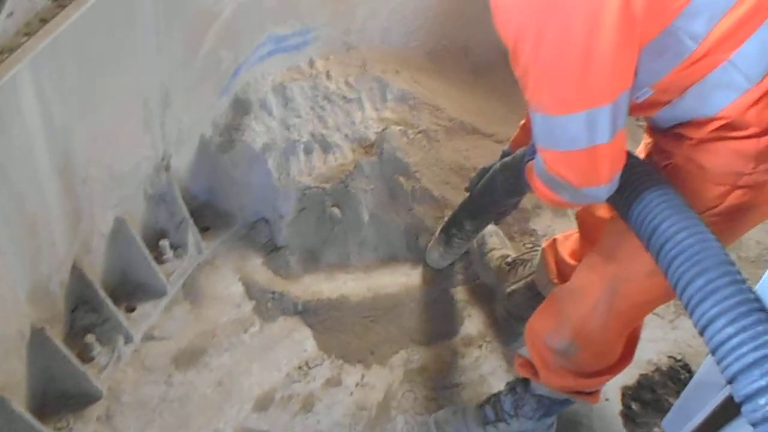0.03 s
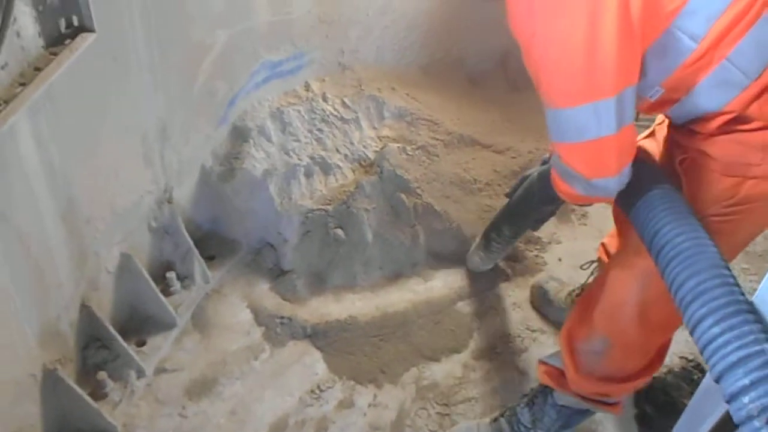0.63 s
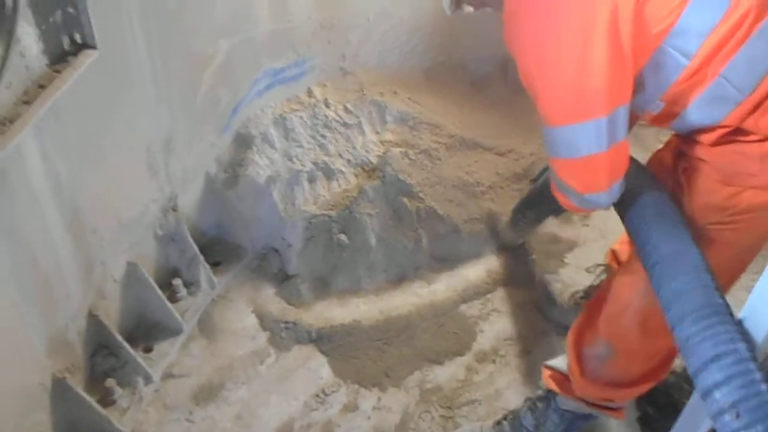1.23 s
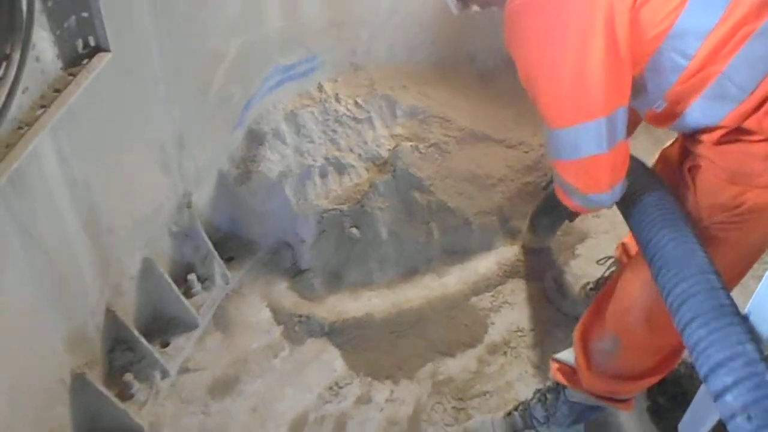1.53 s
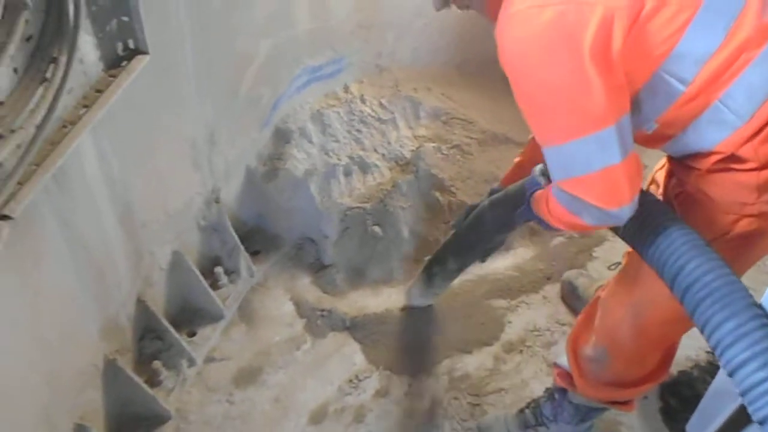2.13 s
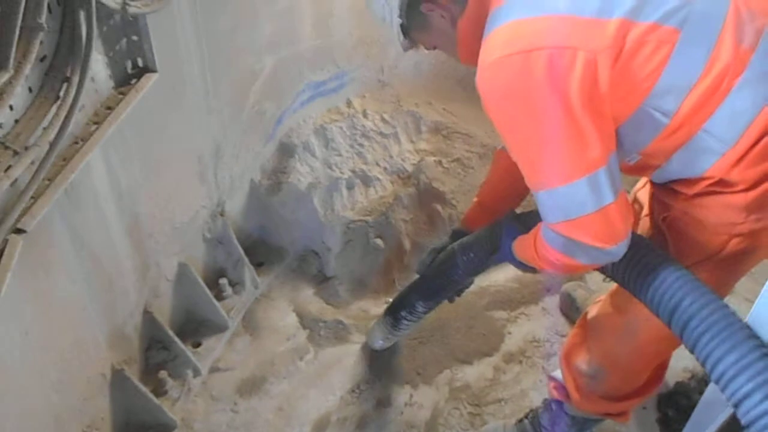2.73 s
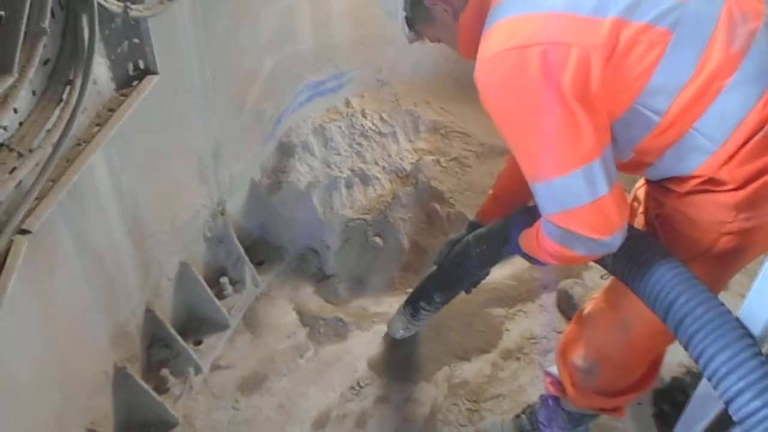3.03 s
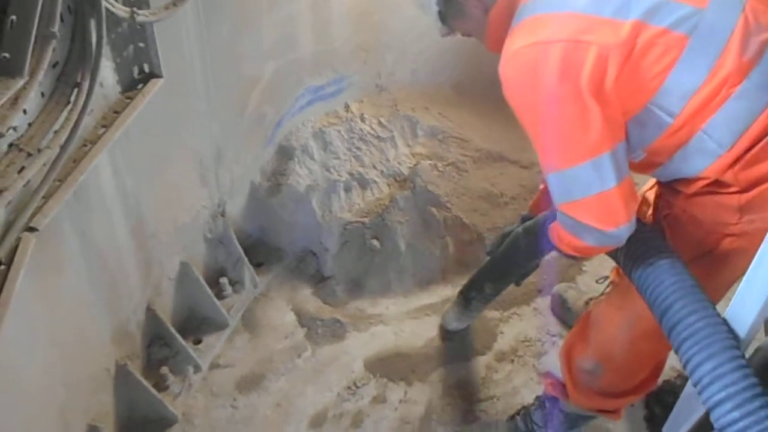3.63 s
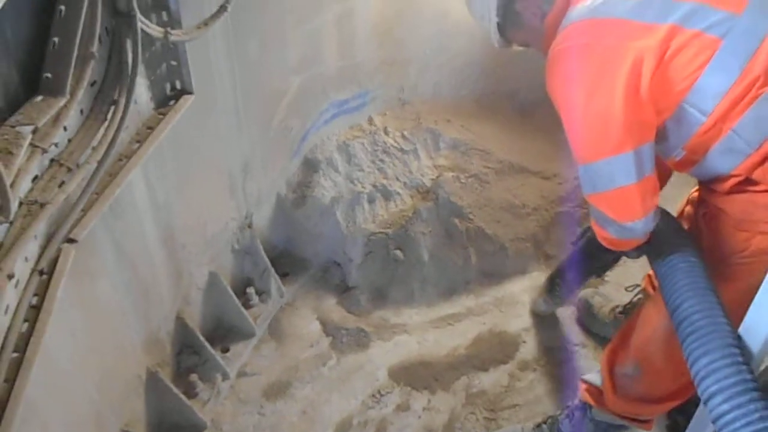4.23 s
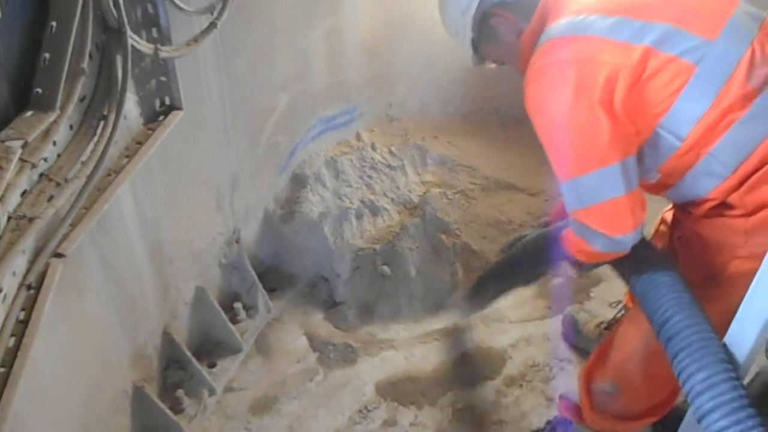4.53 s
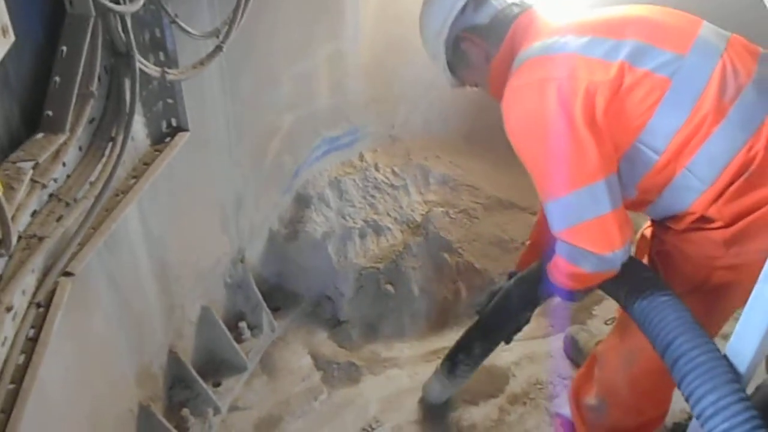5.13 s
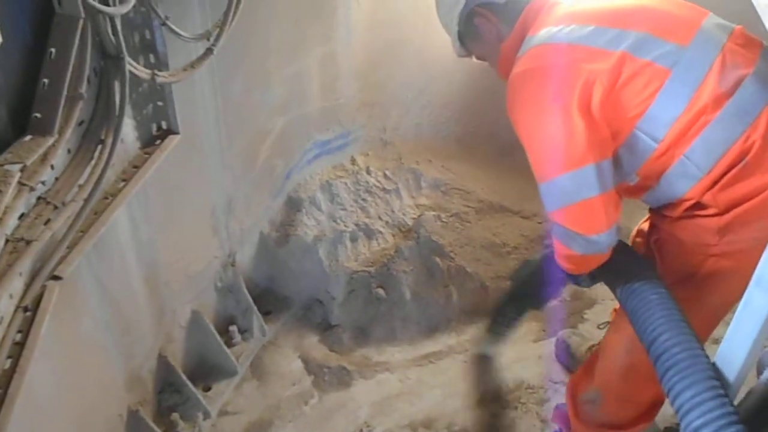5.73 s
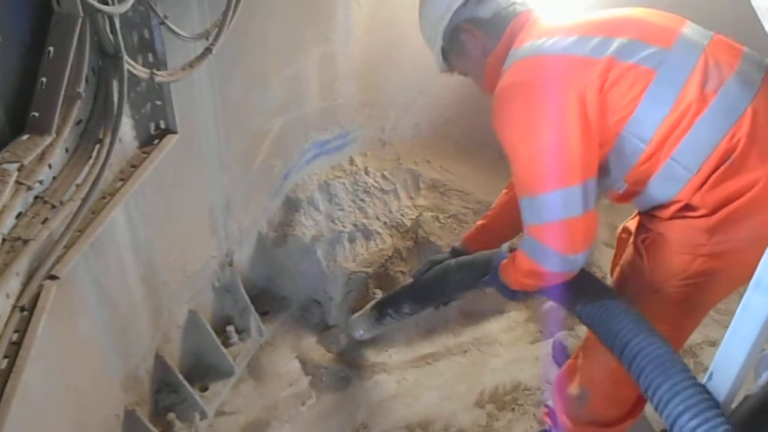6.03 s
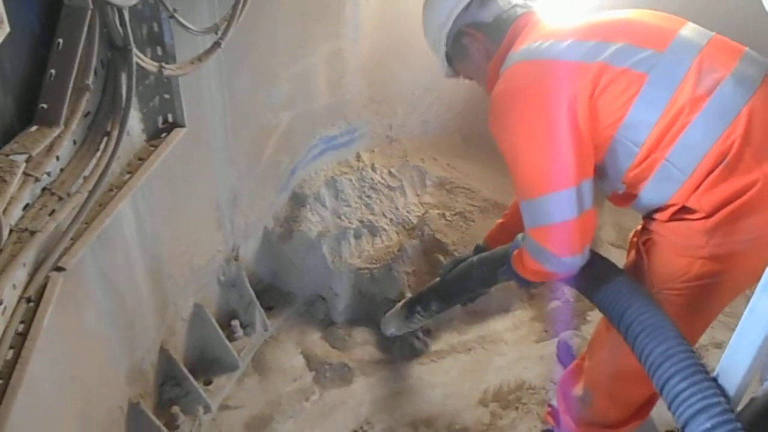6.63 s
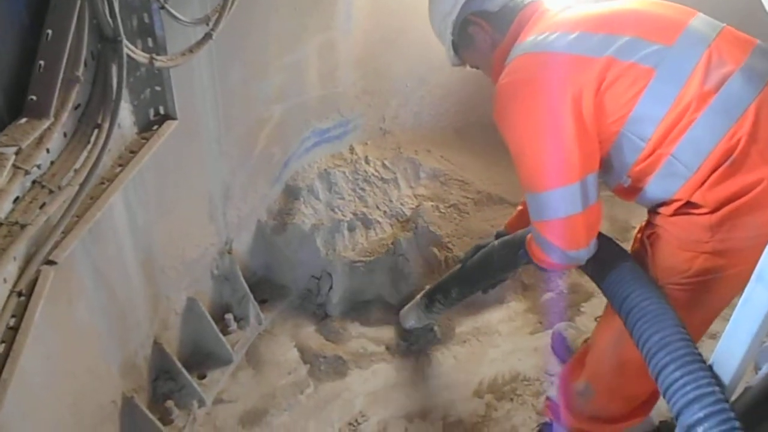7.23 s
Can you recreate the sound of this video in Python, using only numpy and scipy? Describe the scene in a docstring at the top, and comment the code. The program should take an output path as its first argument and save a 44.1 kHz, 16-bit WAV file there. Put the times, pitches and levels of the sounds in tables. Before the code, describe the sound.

A vacuum hose roars as it sucks up sand inside a steel silo, surging and hissing over a low machine drone.

```python
"""Suction hose in a steel silo

A hose draws sand and dust off the silo floor; the vacuum unit drones outside. Turbulent air roars
and sets hose and silo booming. As the nozzle digs in and lifts, the rush swells and brightens,
sand sizzles up the pipe and the nozzle rim whistles."""
import sys
import numpy as np
from scipy import signal
from scipy.fft import rfft, irfft, next_fast_len
from scipy.io import wavfile
from scipy.ndimage import uniform_filter1d

SR = 44100
rng = np.random.default_rng(int(sys.argv[2]) if len(sys.argv) > 2 else 0)


def inscribe(sig):
    """Save sig as 16-bit PCM at rate SR to the path in sys.argv[1].

    A 1-D sig is mono; a 2-D sig holds one channel per row.
    Samples are clipped to [-1, 1] before scaling.
    """
    pcm = np.round(np.clip(np.atleast_2d(sig).T, -1, 1) * 32767)
    wavfile.write(sys.argv[1], SR, pcm.astype(np.int16))


N = 321489
T = np.arange(N) / SR


def air_stream(swells_db, grit, flutter_db, patchy_db, draught_db):
    """Turbulence, gritty with sand towards the top, swelling band by band with the flow."""
    # Stream spectrum. Each row: frequency in Hz, relative density in dB.
    spectrum = [(70, -2), (200, 3), (300, 0.5), (450, -2), (700, -4.5), (1000, -9), (1600, -14.5),
                (2600, -18.5), (3900, -21.5), (5200, -24), (7000, -27.5), (8600, -33), (10200, -35),
                (11100, -52.5)]
    # Centres of roar, rush, hiss and sizzle in Hz.
    flow_hz = [380, 1500, 6000, 9800]
    size = 2 * next_fast_len(N // 2 + 1)
    log_hz = np.log(np.maximum(np.fft.rfftfreq(size, 1 / SR), 1))
    hz, density_db = np.transpose(spectrum)
    colour = rms_one(from_db(np.interp(log_hz, np.log(hz), density_db)))
    sand_share = grit * np.interp(log_hz, np.log([500, 3000]), [0, 1])
    air = rfft(rng.standard_normal(N), size)
    sand = rfft(sand_grains(per_s=7000, spread_db=2.0), size)
    source = colour * (np.sqrt(1 - sand_share) * air + np.sqrt(sand_share) * sand)
    centres = np.log(np.geomspace(150, 11000, 12))
    common_db = flutter_db * drift(8.8)
    out = np.zeros(N)
    for centre, selector in zip(centres, np.eye(len(centres))):
        band = irfft(source * np.interp(log_hz, centres, selector))[:N]
        weights = [np.interp(centre, np.log(flow_hz), row) for row in np.eye(len(flow_hz))]
        out += band * from_db(np.dot(weights, swells_db) + common_db + patchy_db * drift(7.6))
    return from_db(draught_db) * out


def sand_grains(per_s, spread_db):
    """Uneven grains strike the pipe wall at random; rms 1."""
    sizes = from_db(spread_db * np.minimum(rng.exponential(1, N), 5)) * rng.choice([-1, 1], N)
    return rms_one(sizes * (rng.random(N) < per_s / SR))


def sand_bites(flicker_db, sizzle_ratio):
    """The nozzle bites into sand: rise of roar, rush, hiss and sizzle in dB."""
    # Each row: start, attack, hold and release in seconds, rise of roar, rush and hiss in dB.
    bites = [(-.09, 0.099, 0.12, 0.19, 3.5, 4, 1.5), (0.138, .17, 0.12, 0.24, 7, 7, 6),
             (.52, .33, .02, 0.19, 5.3, 7.5, 4), (.93, .17, 0.036, 0.33, 5.5, 9, 2.5),
             (1.28, .25, .02, 0.12, 5, 7.5, 1), (1.71, 0.39, .22, 0.3, 0.5, .7, 2),
             (2.938, 0.43, .02, 0.23, 6, 3.5, 4), (3.52, 0.48, .02, 0.15, 3.5, 6, 5),
             (4.024, 0.24, 0.17, 0.15, 1, 6.5, 8), (4.57, 0.51, .03, .09, 2.5, 3.5, 3.4),
             (4.962, 0.64, .1, 0.2, 2.5, 9, 2), (5.586, 0.17, .02, .11, -2, 4, 12),
             (5.793, 0.096, 0.43, 0.1, 0.6, 3, 2.5), (6.164, 0.21, 0.064, 0.19, 7, 3.5, 0),
             (6.518, 0.17, 0.081, 0.24, 6, 1.5, -1.5), (6.87, 0.19, .02, 0.27, 5.5, 5, -0.3)]
    roar, rush, hiss = sum(np.outer(row[4:], envelope(*row[:4])) for row in bites)
    return np.array([roar + flicker_db * drift(6), rush, hiss, sizzle_ratio * hiss])


def silo_walls(x):
    """Close steel walls echo the rush and ripple its spectrum at equal power."""
    # Each row: delay in seconds, gain in dB.
    walls = [(.0047, -28.5), (.0083, -31.5), (0.013, -15), (0.021, -17.5), (0.026, -18)]
    echoes = sum(from_db(db) * np.interp(T - delay_s, T, x, left=0) for delay_s, db in walls)
    return (x + echoes) / np.sqrt(1 + sum(from_db(db) ** 2 for _, db in walls))


def silo_boom(roar_db):
    """Low modes of hose and silo boom steadily; higher silo modes follow the roar."""
    # Each row: frequency in Hz, width in Hz, base level in dB.
    low_modes = [(16.32, 2.76, -17), (24.15, 10.4, -25), (50.2, 2.8, -39.5), (91, 31, -48),
                 (95.1, 4.1, -35.5), (113.6, 5, -31), (124.7, 4.1, -34), (135.4, 3.1, -41.5),
                 (148.8, 6.4, -36), (174.35, 9.1, -34.5), (191, 6.1, -43.5), (211.4, 5.8, -38)]
    high_modes = [(220.8, 3.8, -41), (236.4, 13.6, -38.5), (249.5, 5.9, -50.5), (276.3, 11.7, -41.5),
                  (303.4, 9.5, -49.5), (324.7, 16.4, -45), (350, 13.4, -45), (441.4, 21.5, -46.5),
                  (511, 5, -56.5), (651.5, 8, -56), (1001, 12, -55.5), (1125, 8.7, -57)]
    boom = standing_waves(low_modes, span_s=0.73)
    return boom + from_db(-2.5 + 0.9 * roar_db) * standing_waves(high_modes, span_s=0.31)


def hose_surge(rest_db=-23, half_throb_s=0.074):
    """The air column beats and throbs harder as each slug of sand passes."""
    # Each row: frequency in Hz, width in Hz, relative level in dB.
    column_modes = [(56.44, 2.56, -1.4), (61.9, 4.6, -2.5)]
    # Each row: time in seconds, rise in dB.
    slugs = [(1.17, 4.5), (1.7, 2.5), (2.42, 9), (3.07, 4), (3.25, 5.5), (4.0, 5.5), (4.48, 7), (4.98, 7),
             (5.68, 9.5), (6.05, 7), (6.28, 8), (6.62, 5), (6.85, 5)]
    load_db = sum(db * np.exp(-((T - at_s) / half_throb_s) ** 2) for at_s, db in slugs)
    return steadied(resonances(column_modes), span_s=0.29) * from_db(rest_db + load_db)


def nozzle_hiss(hiss_db):
    """Nozzle resonances, weakly following the stream's hiss."""
    # Each row: frequency in Hz, width in Hz, base level in dB.
    modes = [(7650, 620, -59), (8110, 870, -56.5), (3910, 280, -63.5)]
    return from_db(-1.3 + 0.21 * hiss_db) * resonances(modes)


def nozzle_whistles():
    """Edge tones with the rim near the sand; blown harder, a note grows purer and sags."""
    # Each entry, by register: pitch in Hz, width in Hz, peak tone-to-breath ratio, peak sag in Hz.
    registers = {"pipe": (1622, 41, .6, 0), "rim": (4520, 200, 1.3, 95), "high": (8220, 160, 1.0, 270)}
    # Each row: start, attack, hold and release in seconds, rms level in dB, register.
    notes = [(1.2, 0.34, 1.3, .3, -63, "high"), (1.58, 0.039, .03, 0.41, -54, "rim"),
             (2.597, .015, .035, .03, -51.5, "rim"), (2.706, .015, .03, .08, -51, "rim"),
             (2.598, .02, 0.064, 0.12, -50.5, "pipe"), (2.8, 0.453, .06, .12, -56, "rim"),
             (3.027, .1, .36, 0.32, -49, "pipe"), (3.127, .07, 0.0486, 0.147, -57, "high"),
             (3.783, 0.057, 0.19, 0.11, -53, "rim"), (3.763, .12, 0.028, .06, -47, "high"),
             (3.92, 0.057, .1, .15, -53.5, "high"), (4.262, 0.077, 0.087, .06, -47.5, "rim"),
             (5.0, 0.053, 0.6, 0.13, -51.5, "rim"), (5.04, .06, .1, .4, -54.5, "high"),
             (5.54, .12, .03, 0.044, -45, "rim")]
    out = np.zeros(N)
    for name, (hz, width_hz, purity, sag_hz) in registers.items():
        level = sum(from_db(db) * envelope(*shape) for *shape, db, register in notes if register == name)
        drive = level / level.max()
        out += level * edge_tone(hz - sag_hz * drive, width_hz, purity * drive)
    return out


def gap_squeal(start_s=3.71, fade_after_s=0.94, fade_db_per_s=16):
    """Air squeals through a narrow gap: the pitch sags and steadies, the note fades over a fine hiss."""
    # Hiss resonance. Each row: frequency in Hz, width in Hz, rms level in dB.
    spray = [(9300, 1500, -66)]
    settled_hz, sag_hz, jitter_hz, mirror_hz = 10365, 290, 90, 11025
    age_s = np.maximum(T - start_s, 0)
    hz = settled_hz + sag_hz * np.exp(-(age_s / .23) ** 2)
    hz += jitter_hz * np.exp(-age_s / 0.64) * drift(300)
    squeal = edge_tone(hz, width_hz=71.4, purity=0.9)
    # Faint rising high tone: the recorder mirrors the squeal about 11025 Hz.
    alias = from_db(-14) * edge_tone(2 * mirror_hz - hz, width_hz=70, purity=1.2)
    level_db = -57.5 - fade_db_per_s * np.maximum(age_s - fade_after_s, 0)
    gap = envelope(start_s, attack_s=0.17, hold_s=2.48, release_s=.06)
    return gap * (from_db(level_db) * (squeal + alias) + resonances(spray))


def noise_swells():
    """Brief swells of narrow-band noise, low hoots to higher rasps, colour the rush."""
    # Each row: middle and half length in seconds, centre and width in Hz, level in dB.
    swells = [(.07, 0.3, 523, 160, -35), (0.206, 0.15, 175.5, 13, -27.5), (0.836, 0.44, 512, 310, -33),
              (0.863, 0.13, 184.7, 26, -23.5), (1.135, 0.17, 994, 43, -37.5), (3.879, 0.25, 638, 50, -45),
              (4.442, 0.042, 2600, 1700, -45), (5.716, 0.19, 1750, 600, -44), (5.73, .11, 2860, 420, -47.5),
              (6.303, 0.19, 1280, 360, -39), (6.31, 0.19, 244, 16, -26.5), (6.43, 0.39, 351, 25, -36.5),
              (7.068, 0.14, 2050, 260, -46), (7.114, 0.21, 377, 34, -36.5)]
    out = np.zeros(N)
    for middle_s, half_s, hz, width_hz, db in swells:
        near = np.abs(T - middle_s) < half_s
        noise = rng.standard_normal(N)[near]
        bandpass = signal.butter(2, [hz - width_hz / 2, hz + width_hz / 2], "band", fs=SR, output="sos")
        band = signal.sosfilt(bandpass, np.tile(noise, 2))[len(noise):]
        swell = np.cos(np.pi / 2 * (T[near] - middle_s) / half_s) ** 2
        out[near] += from_db(db) * swell * steadied(band, half_s / 2)
    return out


def lumps(tick_t60_s=.03):
    """A lump ticks on the rim and its grains rattle away up the pipe."""
    # Each row: start in seconds, level in dB, rattle's 60 dB decay time in seconds.
    gulps = [(2.604, -44.5, 0.71), (6.312, -48.5, 0.5)]
    # Each row: frequency in Hz, width in Hz, gain in dB.
    rattle_modes = [(1740, 700, 4.5), (4500, 3000, -18)]
    tick_modes = [(1100, 900, 10), (3600, 3000, 0)]
    rattle, tick = np.zeros((2, N))
    for start_s, db, t60_s in gulps:
        age_s = np.maximum(T - start_s, 0)
        rattle += (T >= start_s) * from_db(db - 60 * age_s / t60_s)
        tick += (T >= start_s) * from_db(db - 60 * age_s / tick_t60_s)
    return rattle * resonances(rattle_modes) + tick * resonances(tick_modes)


def vacuum_unit(whine_hz=598, thin_hz=3865, thin_db_per_s=1):
    """Engine drone and wavering blower tones, heard from inside the silo."""
    # Each row: time in seconds, pitch in Hz, base level in dB.
    drone_curve = [(0, 112.5, -24), (.55, 112.3, -23), (1.3, 111.8, -26.5), (2.4, 111.1, -26),
                   (3.9, 111.8, -27.5), (5.4, 114.5, -35), (6.25, 112, -30), (7.29, 112.3, -32)]
    # Each row: multiple of the pitch, gain in dB.
    harmonics = [(1, 4), (2, -17.5)]
    # Each row: time in seconds, base level in dB.
    whine_curve = [(0, -46), (1.3, -44.5), (2.1, -39.5), (2.7, -43), (3.35, -43), (5.5, -52), (6.25, -46),
                   (7.29, -53)]
    # Each row: frequency in Hz, level in dB.
    lesser_tones = [(1387, -63.5), (1820, -66)]
    drone_hz, drone_db = in_time(drone_curve)
    phase = phase_of(drone_hz)
    out = sum(from_db(drone_db + db) * np.sin(order * phase) for order, db in harmonics)
    whine_db = in_time(whine_curve)[0] + 0.5
    thin_db = -64 + thin_db_per_s * T
    for hz, db in [(whine_hz, whine_db), (thin_hz, thin_db), *lesser_tones]:
        out += from_db(db + 2 * np.tanh(drift(4.9))) * np.sin(phase_of(hz + 2 * drift(8.5)))
    return out


def edge_tone(hz, width_hz, purity):
    """Narrow-band breath around a wavering pure core; rms 1."""
    core = np.sqrt(2) * np.sin(phase_of(hz + width_hz / 8 * drift(24.3)))
    lowpass = signal.butter(2, width_hz / 2, fs=SR, output="sos")
    in_phase, quadrature = signal.sosfilt(lowpass, rng.standard_normal((2, N)))
    phase = phase_of(hz)
    breath = rms_one(in_phase * np.cos(phase) + quadrature * np.sin(phase))
    return (breath + purity * core) / np.sqrt(1 + purity ** 2)


def resonances(modes):
    """Turbulence rings each mode; two stages keep the valleys between them dark."""
    out = np.zeros(N)
    for hz, width_hz, db in modes:
        r = np.exp(-np.pi * width_hz / SR)
        stage = [1 - r, 0, r - 1, 1, -2 * r * np.cos(2 * np.pi * hz / SR), r * r]
        ringing = signal.sosfilt([stage, stage], rng.standard_normal(N + SR // 2))[-N:]
        out += from_db(db) * rms_one(ringing)
    return out


def standing_waves(modes, span_s):
    """Modes fed by a constant draught: each beats but keeps its strength."""
    return sum(from_db(db) * steadied(resonances([(hz, width, 0)]), span_s) for hz, width, db in modes)


def steadied(x, span_s):
    """Level out slow swells; rms 1."""
    return rms_one(x / np.sqrt(uniform_filter1d(x ** 2, int(span_s * SR)) + 1e-12))


def envelope(start_s, attack_s, hold_s, release_s):
    """Smooth rise to 1, hold, smooth fall."""
    up = np.clip((T - start_s) / attack_s, 0, 1)
    down = np.clip((start_s + attack_s + hold_s + release_s - T) / release_s, 0, 1)
    return np.sin(np.pi / 2 * np.minimum(up, down)) ** 2


def drift(rate_hz):
    """Smooth random wander; rms 1."""
    step, warmup = 40, 2000
    r = np.exp(-2 * np.pi * rate_hz * step / SR)
    slow = signal.lfilter([1], [1, -2 * r, r * r], rng.standard_normal(N // step + warmup + 2))[warmup:]
    return np.interp(np.arange(N) / step, np.arange(len(slow)), rms_one(slow))


def in_time(rows):
    """Each column of a curve at every sample."""
    times_s, *columns = np.transpose(rows)
    return [np.interp(T, times_s, column) for column in columns]


def phase_of(hz):
    """Running phase in radians."""
    return 2 * np.pi * np.cumsum(hz * np.ones(N)) / SR


def from_db(db):
    """Decibels to gain."""
    return 10 ** (np.asarray(db) / 20)


def rms_one(x):
    """Scale to unit rms."""
    return x / np.sqrt(np.mean(x ** 2) + 1e-20)


def scene():
    """Air stream, booming silo and hose, nozzle sounds and the unit outside; mono."""
    swells_db = sand_bites(flicker_db=0.85, sizzle_ratio=1.15)
    roar_db, _, hiss_db, _ = swells_db
    air = silo_walls(air_stream(swells_db, grit=0.39, flutter_db=0.75, patchy_db=0.03, draught_db=-35))
    silo = silo_boom(roar_db)
    nozzle = nozzle_hiss(hiss_db) + nozzle_whistles() + gap_squeal()
    return (air + silo + nozzle + noise_swells() + lumps() + hose_surge() + vacuum_unit())[None]


def record(dry):
    """Rounded peaks, 2 ms end fades, steep treble cut."""
    cutoff_hz = 11870
    fades = np.sin(np.pi / 2 * np.minimum(np.minimum(T, T[::-1]) / .002, 1)) ** 2
    rounded = 1.573 * np.tanh(dry / 1.67)
    return signal.sosfilt(signal.ellip(12, .1, 90, cutoff_hz, fs=SR, output="sos"), fades * rounded)


dry = scene()
out = record(dry)
inscribe(out)
```